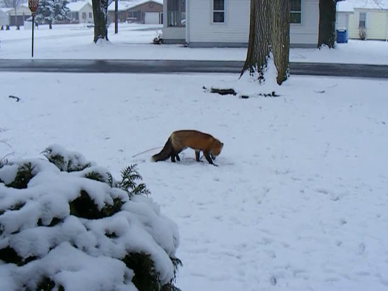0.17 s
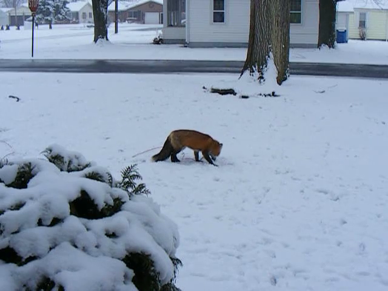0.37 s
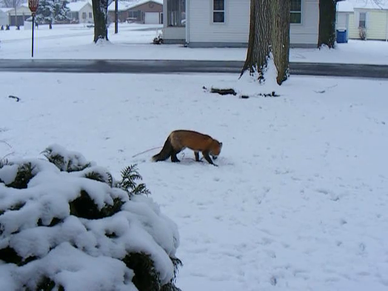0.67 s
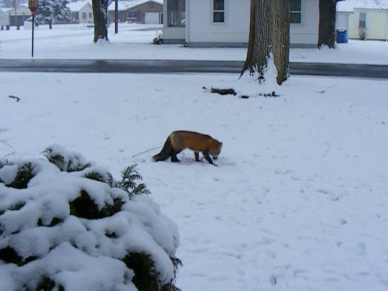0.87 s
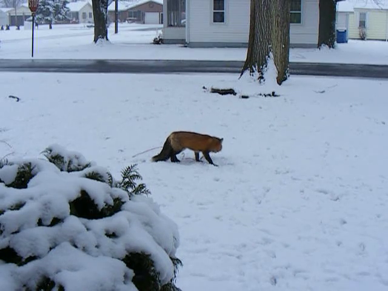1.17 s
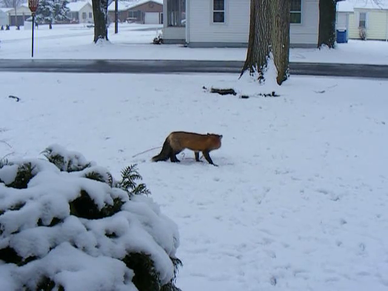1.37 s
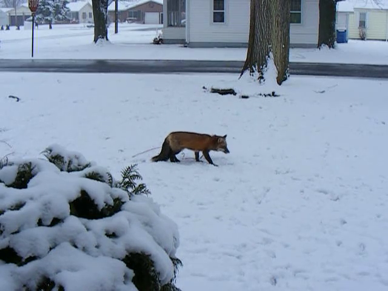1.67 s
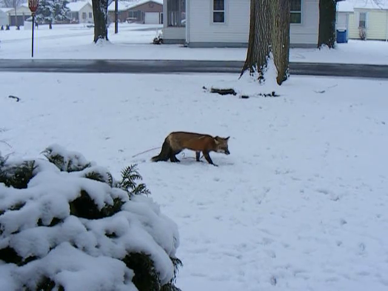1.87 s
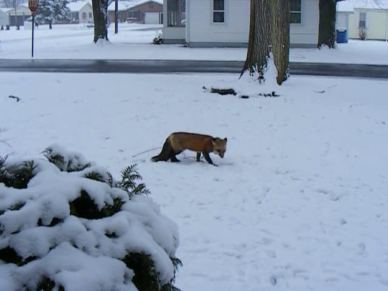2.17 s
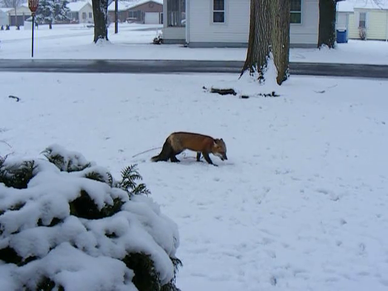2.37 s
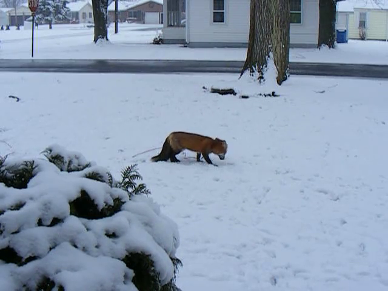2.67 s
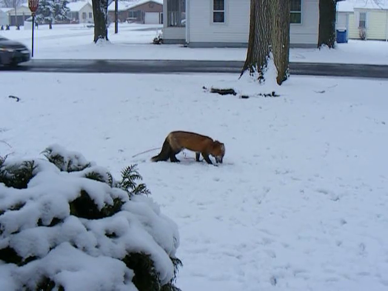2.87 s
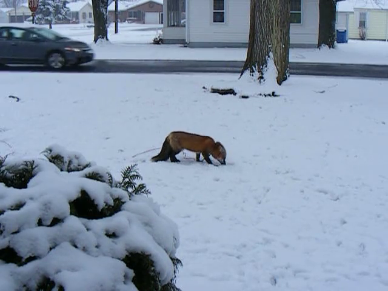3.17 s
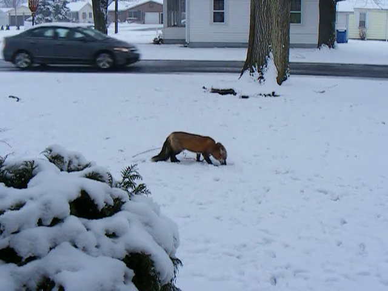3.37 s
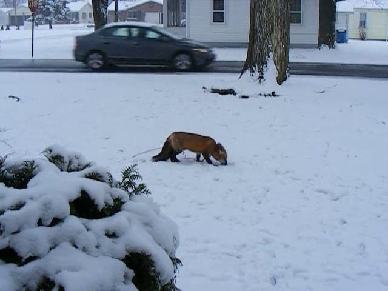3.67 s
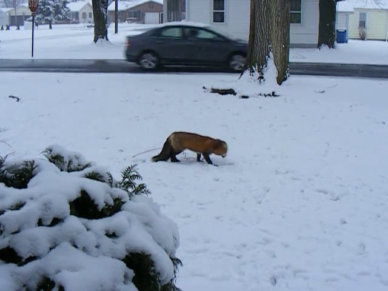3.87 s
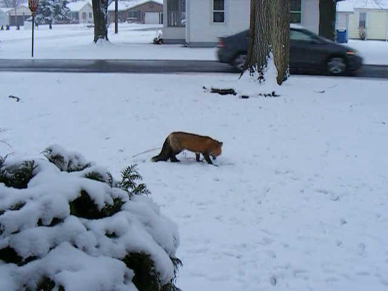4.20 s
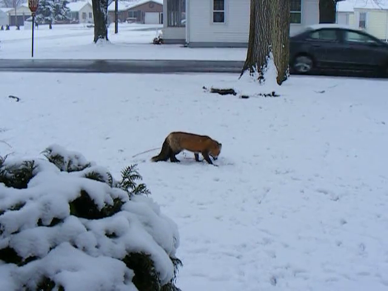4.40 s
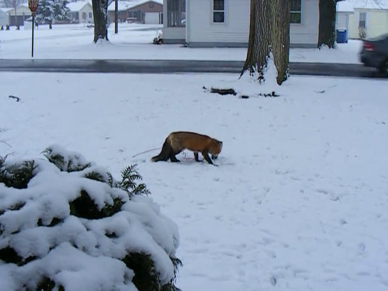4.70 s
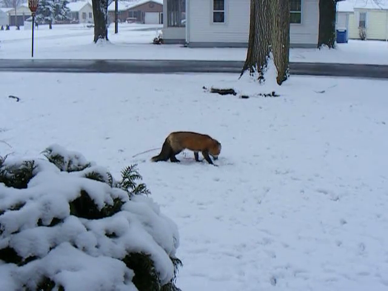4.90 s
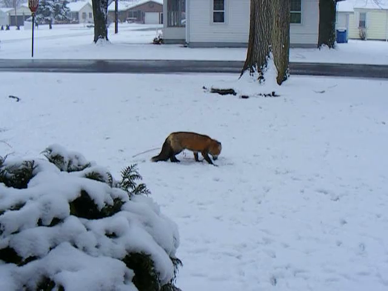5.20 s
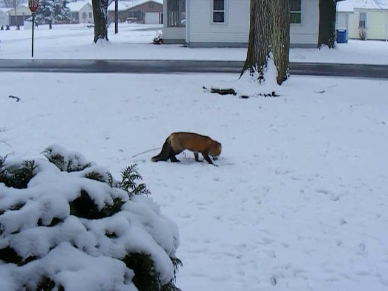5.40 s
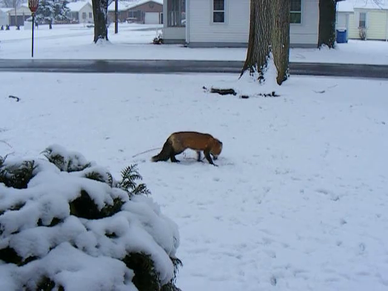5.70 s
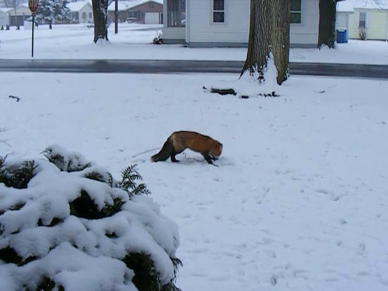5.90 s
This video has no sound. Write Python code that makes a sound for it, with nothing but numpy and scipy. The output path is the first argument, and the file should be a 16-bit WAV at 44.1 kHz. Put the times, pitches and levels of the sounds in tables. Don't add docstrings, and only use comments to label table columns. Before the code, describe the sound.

A distant mono outdoor pickup, narrow in bandwidth and grainy, hears a car on a wet, slushy street beyond a snowy yard. At 0 s there is soft tyre noise, dull rumble and a low engine hum slowly rising. From 0.4 s slush begins to spatter; around 0.95 s it bursts out strongly, with rapid wet slaps, ringing ticks and sharp droplet cracks until about 2 s. Near 1.5 s the gear changes and the hum drops, then steadies. From 2.2 to 4.1 s the spatter thins into a smoother watery hiss with a few light ticks as rumble grows. At about 4.3 s a wet splash lifts the hiss, with another around 4.65 s. After 5 s the engine sinks lower, tyre roar thickens, and heavy clods land with short hollow, low rings between 5.2 and 6 s, amid scattered droplet clicks.

```python
import sys
import numpy as np
from scipy import signal
from scipy.fft import rfft, irfft
from scipy.io import wavfile

SR = 44100
rng = np.random.default_rng(int(sys.argv[2]) if len(sys.argv) > 2 else 0)


def dump(signal):
    limited = np.clip(np.atleast_2d(signal).T, -1, 1)
    pcm = np.round(limited * 32767).astype(np.int16)
    wavfile.write(sys.argv[1], SR, pcm)


def invert_db(level):
    return 10 ** (np.asarray(level, dtype=float) / 20)


N = 266760
T = np.arange(N) / SR
HZ = np.maximum(np.fft.rfftfreq(N, 1 / SR), 1)

# time in seconds, level re middle distance in dB.
CLOSENESS = [(0, -6.5), (.5, -6), (1.2, -3), (1.7, -2.5), (2.9, -1), (3.7, 2.5), (4.15, 3), (4.6, 2.5),
             (5.1, 6), (5.6, 7.5), (6.05, 4.5)]
# time in seconds, water film in dB, slush depth [0-1].
ROAD_STATE = [(0, -7, .05), (.35, -4.5, .1), (.43, 1.5, 0.2), (.6, -1.5, .3), (.9, -2, 0.3),
              (.96, -0.5, 0.4), (1.15, 4.5, 0.8), (1.48, 0, 0.7), (1.62, 5, 0.7), (1.8, 3.5, 0.6),
              (2.12, 0.5, .4), (2.85, -3.5, 0.2), (3.9, 1.5, .08), (4.14, -0.5, 0.05), (4.34, 6.5, 0.2),
              (4.9, 4, 0.09), (5.1, 1.5, .05), (6.05, -1, 0.1)]


def rms_one(x):
    return x / np.sqrt(np.mean(x ** 2) + 1e-20)


def in_time(rows):
    s, *columns = np.transpose(rows)
    return [np.interp(T, s, column) for column in columns]


def swell(start_s, end_s, fade_s):
    return np.clip(np.minimum(T - start_s, end_s - T) / fade_s + 0.5, 0, 1)


def coloured(x, points):
    hz, level_db = np.transpose(points)
    gain_db = np.interp(np.log(HZ), np.log(hz), level_db, left=-120, right=-120)
    return irfft(rfft(x) * invert_db(gain_db), N)


def drift(rate_hz):
    r = np.exp(-2 * np.pi * rate_hz / SR)
    slow = signal.lfilter([1], [1, -2 * r, r * r], rng.standard_normal(N + SR))[SR:]
    return rms_one(slow - slow.mean())


def ring(clicks, hz, t60_s):
    r = invert_db(-60 / (t60_s * SR))
    w = 2 * np.pi * hz / SR
    return signal.lfilter([0, np.sin(w)], [1, -2 * r * np.cos(w), r * r], clicks + 1e-18)


def tyres():
    # frequency in Hz, density in dB per Hz.
    tyre_colour = [(190, -33.5), (330, -6), (367, -26.5), (413, -7.5), (710, -4), (941, -1.5), (1210, 2),
                   (1530, -1), (1980, -2), (2150, -1.5), (3240, -6.5), (4510, -19.5), (5510, -30),
                   (7160, -64.5), (12100, -120)]
    edges_hz = [845, 1657, 3105]
    # frequency in Hz, width in Hz, start in seconds, end in seconds, level over its range in dB.
    ridges = [(2170, 220, .42, .93, -5), (2160, 190, .93, 1.12, -1), (2160, 170, 1.12, 1.5, 1.5),
              (2170, 170, 1.5, 2.02, -2), (1340, 160, .97, 1.75, -3.5), (1250, 150, -1, .9, -6),
              (3800, 260, 1.7, 2.9, -4), (1530, 120, 2.3, 3.55, -1.5), (1480, 170, 3.45, 4.1, -3.5),
              (3100, 450, 2.33, 3.5, -5), (2780, 150, 2.55, 3.1, -9), (4750, 300, 3.0, 4.1, -15),
              (920, 130, 4.55, 5.15, -2), (970, 100, 5.15, 5.92, 2.5), (880, 90, 4.17, 4.55, -.5),
              (1100, 120, 5.1, 5.68, -1.5), (280, 70, 5.58, 5.76, -3.5), (2030, 200, 4.32, 4.47, -5),
              (2450, 550, 4.45, 5.03, -5.5), (300, 60, 5.8, 6.1, -7), (2100, 250, 3.6, 4.15, -6),
              (5350, 400, 2.6, 3.9, -22), (5250, 450, 3.9, 6.1, -16.5), (5350, 400, -1, .9, -18),
              (5350, 400, .9, 2.6, -27), (637, 90, 5.5, 6.1, -6), (1800, 150, 5.15, 5.75, -6),
              (419, 60, -1, 2.2, -3.5), (4350, 300, 3.5, 5.0, -10.5), (1040, 150, 1.1, 1.5, -8),
              (780, 120, 4.5, 5.1, -3), (1500, 250, 5.1, 5.65, -2), (3800, 250, 1.0, 1.7, -8),
              (4600, 450, 1.0, 1.9, -15), (4400, 300, .2, .8, -13), (317, 27, 2.2, 2.6, -7.5),
              (2700, 250, 5.75, 6.1, -8), (3200, 400, 1.85, 2.2, -8), (3600, 200, 3.2, 4.1, -8),
              (530, 45, 5.45, 6.0, -5)]
    _, slush = in_time(ROAD_STATE)
    lump_share = np.clip(0.08 + 0.55 * slush, 0, 0.8)
    smooth_gain, lump_gain = np.sqrt(1 - lump_share), np.sqrt(lump_share)

    smooth = rng.standard_normal(N)
    wet = smooth_gain * smooth + lump_gain * lumps()
    above = [1] + [1 / (1 + (hz / HZ) ** 16) for hz in edges_hz] + [0]
    levels_db = tyre_levels()
    out = np.zeros(N)
    for k, level_db in enumerate(levels_db):
        source = coloured(wet if k else smooth, tyre_colour)
        range_gain = np.sqrt(np.maximum(above[k] - above[k + 1], 0))
        band = rms_one(irfft(rfft(source) * range_gain, N))
        out += invert_db(level_db + 0.61 * drift(6.9)) * band

    excite = rfft(smooth_gain * rng.standard_normal(N) + lump_gain * lumps())
    flicker_db = 1.8 * drift(20)
    for k, (hz, width_hz, start_s, end_s, over_db) in enumerate(ridges):
        range_db = levels_db[np.searchsorted(edges_hz, hz / 1.1)]
        ridge = rms_one(irfft(excite / (1 + ((HZ - hz) / width_hz) ** 2) ** 2, N))
        own_flicker_db = np.roll(flicker_db, k * N // len(ridges))
        out += swell(start_s, end_s, 0.081) * invert_db(range_db + over_db + own_flicker_db) * ridge
    return out


def tyre_levels():
    # level in dB, share of closeness, share of water film, lift at full slush in dB.
    ranges = [
        (-33.5, 0.85, 0.011, 0.3),
        (-33, -.1, 0.12, 8),
        (-28.5, 0.01, 1.0, 0.45),
        (-43, 0.01, 0.19, 14),
    ]
    # start in seconds, lift in dB, decay in seconds.
    sheets = [(.938, 9.5, .025), (.96, 0, .4), (.99, 1, .012), (1.045, 7.5, .012), (1.56, 5.5, 0.082),
              (1.74, 4.5, 0.018), (3.0, 4, .5), (3.64, 3, .05)]
    near_db, = in_time(CLOSENESS)
    water_db, slush = in_time(ROAD_STATE)
    wet_db, roar_db = puddles()
    sheet_db = sum(db * (T > s) * np.exp(-np.maximum(T - s, 0) / fall_s) for s, db, fall_s in sheets)
    levels_db = []
    for k, (db, near_share, water_share, slush_db) in enumerate(ranges):
        level_db = db + near_share * near_db + water_share * water_db + slush_db * slush
        levels_db.append(level_db + (wet_db if k else roar_db))
    levels_db[-1] = levels_db[-1] + sheet_db
    return levels_db


def puddles():
    # time in seconds, lift in dB, decay in seconds, tread roar share.
    puddle_hits = [(.42, 0, .05, 0.1), (0.944, 5.5, 0.025, 0.082), (1.039, 2, 0.034, 0.74),
                   (1.15, 0, 0.026, 0.09), (1.307, 2.5, 0.024, 0.18), (1.402, 4.5, 0.014, .1),
                   (1.445, 3, .015, .1), (1.604, 3, 0.021, 0.11), (1.929, 4.5, 0.024, .5),
                   (2.03, 3.5, 0.041, 1), (4.64, 3.5, 0.052, 0.55), (5.2, 1, .04, 0.39),
                   (5.331, 1.9, 0.059, 2.2), (5.5, 0.5, .08, .8), (5.654, 0, 0.042, 3.3),
                   (5.8, 0, 0.15, 1.5)]
    rise_s = 0.006
    wet_db, roar_db = np.zeros(N), np.zeros(N)
    for s, lift_db, fall_s, roar_share in puddle_hits:
        rise = np.clip((T - s) / rise_s + 1, 0, 1)
        lift = lift_db * rise * np.exp(-np.maximum(T - s, 0) / fall_s)
        wet_db += lift
        roar_db += roar_share * lift
    return wet_db, roar_db


def lumps():
    drops_per_s = 900 * invert_db(2.5 * drift(30.0))
    born = rng.random(N) < drops_per_s / SR
    sizes = invert_db(3.5 * np.minimum(rng.exponential(1, N), 3))
    fade = np.exp(-1 / (0.00081 * SR))
    power = signal.lfilter([1], [1, -fade], born * sizes ** 2)
    return rms_one(np.sqrt(power) * rng.standard_normal(N))


def splats():
    # time in seconds, peak in dB, ring in Hz.
    big_splats = [(0.433, -13.5, 2094), (0.5512, -15, 1555), (0.654, -13.5, 2290), (0.7304, -8, 2130),
                  (0.8725, -11, 1520), (0.9504, -4.5, 2210), (1.0262, -10.5, 2235), (1.0556, -11, 2146),
                  (1.099, -7.5, 2280), (1.1359, -8.5, 1275), (1.1624, -5.5, 2350), (1.2192, -10.5, 1300),
                  (1.2562, -6, 1346), (1.266, -9, 2130), (1.2942, -7.5, 2070), (1.3085, -7.5, 2175),
                  (1.325, -9.5, 2160), (1.462, -10, 2170), (1.401, -7.5, 2150), (1.4318, -6.5, 2160),
                  (1.5405, -11.5, 2150), (1.6014, -7, 2360), (1.6258, -12.5, 1327), (1.6483, -6, 2180),
                  (1.6752, -7, 1607), (1.6932, -8.5, 2240), (1.7131, -12, 2165), (1.9586, -6.5, 2140),
                  (1.9765, -12, 2410), (2.0124, -12.5, 1460), (2.0637, -14, 2110), (2.2289, -11, 1680),
                  (0.5933, -17.5, 1248), (0.6881, -12, 2194), (0.8078, -12.5, 2170), (0.8442, -11.5, 2064),
                  (1.0058, -6.5, 2166), (1.5162, -11.5, 2155), (1.5681, -11, 2130), (1.7511, -14.5, 1404),
                  (1.9302, -10, 1543), (1.9971, -12, 1575), (2.0902, -11.5, 2120), (2.1586, -11, 2260),
                  (2.206, -12.5, 1986), (2.412, -13.5, 3160), (2.458, -13, 3260), (2.487, -14.5, 3080),
                  (2.5257, -18, 1500), (2.62, -12.5, 2900), (2.8939, -15, 2780), (3.1189, -15, 1433),
                  (3.6357, -17.5, 1584), (4.2124, -14, 1516), (4.3172, -16.5, 2034), (4.3606, -7, 2050)]
    rows = big_splats + small_splats()
    out, length = np.zeros(N), round(0.03 * SR)
    bursts = rng.standard_normal((len(rows), length)) * np.exp(-np.arange(length) / (0.0023 * SR))
    soft = signal.butter(5, [950, 3800], "band", fs=SR, output="sos")
    for (s, peak_db, hz), burst in zip(rows, signal.sosfilt(soft, bursts)):
        splat = ring(burst, hz, 0.0073) + 0.25 * ring(burst, 1.5 * hz, 0.0021)
        at = round(s * SR)
        out[at:at + length] += invert_db(peak_db - 1) * splat / np.abs(splat).max()
    return out


def small_splats(count=14):
    from_s, to_s = 0.38, 2.25
    arch_hz, sill_hz = 2130, 1460
    chance = rng.random((count, 4))
    s = from_s + (to_s - from_s) * (np.arange(count) + chance[:, 0]) / count
    slush = in_time(ROAD_STATE)[1][(s * SR).astype(int)]
    peak_db = -19.5 + 4.5 * slush + 4 * (chance[:, 1] - 0.5)
    hz = np.where(chance[:, 2] < 0.6, arch_hz, sill_hz) * (1 + 0.084 * (chance[:, 3] - 0.5))
    return list(zip(s, peak_db, hz))


def cracks():
    # time in seconds, peak in dB.
    drop_hits = [(0.058, -14.5), (0.949, -2.5), (1.162, -4.5), (1.265, -5.5), (1.306, -3.5), (1.4, -7),
                 (1.407, -8.5), (1.446, -11), (1.54, -2), (1.605, -5.5), (1.626, -4), (1.648, -7.5),
                 (1.675, -5.5), (1.693, -5), (1.713, -5.5), (1.751, -9), (1.777, -8.5), (1.945, -8.5),
                 (1.959, -4.5), (4.712, -7.5), (4.775, -11), (5.224, -12), (5.351, -7.5), (5.395, -10),
                 (5.664, -11.5), (5.708, -15), (5.803, -14.5)]
    s, peak_db = np.transpose(drop_hits)
    clicks = np.zeros(N)
    clicks[(s * SR).astype(int)] = invert_db(peak_db - 4) * rng.choice([-1, 1], len(s))
    body = signal.butter(3, [850, 3000], "band", fs=SR, output="sos")
    click_peak = np.abs(signal.sosfilt(body, signal.unit_impulse(200))).max()
    return signal.sosfilt(body, clicks + 1e-18) / click_peak


def clods():
    # time in seconds, peak in dB, ring in Hz.
    clod_hits = [(5.225, -15, 1045), (5.345, -11.5, 890), (5.395, -11, 990), (5.48, -11.5, 980),
                 (5.63, -14.5, 682), (5.66, -11, 621), (5.665, -10.5, 910), (5.705, -13.5, 883),
                 (5.8, -12.5, 536), (5.815, -11.5, 950), (6.01, -14, 897)]
    out, length = np.zeros(N + SR), round(0.06 * SR)
    pushes = rng.standard_normal((len(clod_hits), length)) * np.exp(-np.arange(length) / (0.004 * SR))
    for (s, peak_db, hz), push in zip(clod_hits, pushes):
        clod = ring(ring(push, hz, 0.012), hz, 0.022)
        at = round(s * SR)
        out[at:at + length] += invert_db(peak_db - 5) * clod / np.abs(clod).max()
    return out[:N]


def engine():
    # time in seconds, firing rate in Hz, level in dB.
    engine_speed = [(0.0, 65.28, -41), (0.5, 69.45, -38), (1.13, 75.65, -39.5), (1.41, 77.3, -36),
                    (1.5, 72.92, -40.5), (1.62, 66, -40), (1.84, 61.9, -38.5), (2.5, 62.63, -36.5),
                    (3.44, 63.93, -35), (3.8, 64.06, -34), (4.09, 63.4, -37), (4.26, 62.9, -46.5),
                    (4.53, 63, -39), (4.94, 63.15, -40), (5.05, 57.7, -39), (5.22, 54.17, -37),
                    (5.49, 49.85, -37.5), (6.05, 50.5, -38.5)]
    # frequency in Hz, width in Hz, level in dB.
    pipe = [(108, 8.8, -42), (145.3, 17, -43), (188.3, 7, -37), (311, 6, -47)]
    # order, start in seconds, end in seconds, lift in
    # dB.
    booms = [(2, -1, 1.4, -3), (2, 1.42, 1.5, -8), (2, 1.64, 1.8, -8), (3, 1.95, 2.7, -3), (3, .8, 1.5, 3),
             (2, 1.5, 1.64, 9), (3, -1, .8, -5), (3, 1.55, 1.8, -8), (3, 2.75, 3.1, 1), (3, 3.12, 3.66, -8),
             (2, 1.7, 4.9, -4), (3, 3.66, 4.15, -1.5), (3, 4.15, 6.1, -10), (2, 5.0, 5.35, 1),
             (2, 5.35, 5.75, 4), (2, 5.75, 6.1, 0), (4, 1.6, 6.1, -8)]
    off_pipe_db = -50.5
    firing_hz, load_db = in_time(engine_speed)
    turn = 2 * np.pi * np.cumsum(firing_hz * (1 + 0.0034 * drift(5.5))) / SR
    out = invert_db(0.4 + load_db + 0.27 * drift(9.9)) * np.sin(turn)
    for order in (2, 3, 4):
        gain = invert_db(off_pipe_db)
        for hz, width_hz, db in pipe:
            gain = gain + invert_db(db) / (1 + ((order * firing_hz - hz) / width_hz) ** 2)
        boom_db = sum(db * swell(start_s, end_s, 0.07) for k, start_s, end_s, db in booms if round(k) == order)
        level_db = boom_db + 0.49 * (load_db - load_db.mean()) + 1.8 * drift(8.0)
        out += gain * invert_db(level_db) * np.sin(order * turn + order)
    return np.sqrt(2) * out


def rumble():
    # frequency in Hz, density in dB per Hz.
    rumble_colour = [(15, -42.5), (25, -12.5), (70, -1.5), (107, -2), (152, -2), (261, -3), (436, -4.5),
                     (500, -4), (650, -35.5), (1100, -120)]
    noise = rms_one(coloured(rng.standard_normal(N), rumble_colour))
    near_db, = in_time(CLOSENESS)
    _, roar_db = puddles()
    return invert_db(-33 + 0.61 * (near_db + roar_db) + 1.2 * drift(8.0)) * noise


def hums():
    # frequency in Hz, start in seconds, end in seconds, level in dB.
    hum_tones = [(60, 0, 1.3, -37.5), (40, 2.42, 2.56, -37), (226, 2.4, 4.9, -41.5), (224, 5.58, 5.88, -33)]
    out = np.zeros(N)
    for hz, start_s, end_s, level_db in hum_tones:
        level = swell(start_s, end_s, 0.2) * invert_db(level_db + 2 * drift(3))
        out += level * np.sin(2 * np.pi * np.cumsum(hz + drift(4)) / SR)
    return out


def hollowed(x):
    # frequency in Hz, width in Hz, start in seconds, end in seconds, share removed [0-1].
    hollows = [(64, 14, .2, 5.0, .5), (580, 60, 2.2, 3.25, .35), (740, 70, -1, 2.3, .45),
               (430, 40, .9, 2.1, .35), (1080, 90, 3.8, 4.2, .35), (400, 70, 4.45, 6.1, .3),
               (900, 70, 4.8, 5.05, .3), (2500, 600, 5.1, 6.1, .17)]
    spectrum = rfft(x)
    removed = np.zeros(N)
    for hz, width_hz, start_s, end_s, share in hollows:
        band = irfft(spectrum / (1 + ((HZ - hz) / width_hz) ** 4), N)
        removed += share * swell(start_s, end_s, 0.1) * band
    return x - removed


def scene():
    echoed = hollowed(tyres() + splats() + rumble())
    return (echoed + cracks() + clods() + engine() + hums())[None]


def band_limit(x):
    return signal.sosfilt(signal.butter(12, 7190, fs=SR, output="sos"), x)


def record(dry):
    # frequency in Hz, gain in dB.
    smoothing = [(20, -3), (4000, -1), (5000, -3.5), (5512, -11.5), (6000, -14), (6500, -25.5), (7000, -41),
                 (7250, -89.5), (22050, -110)]
    step, offset = 1 / 128, -0.0031
    kept = np.zeros(N)
    kept[::4] = 4 * step * np.round(dry[0, ::4] / step)
    mix = coloured(kept, smoothing)[None] + offset
    return band_limit(mix)


dry = scene()
out = record(dry)
dump(out)
```